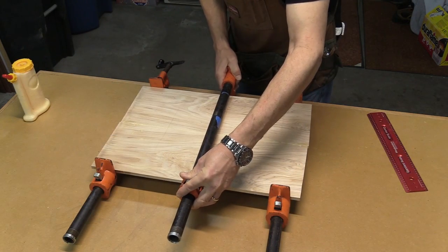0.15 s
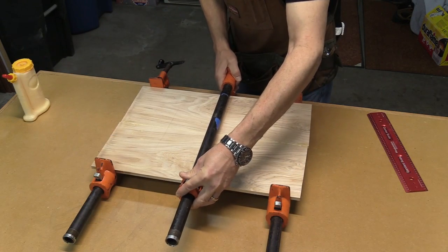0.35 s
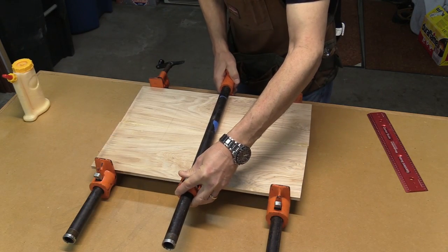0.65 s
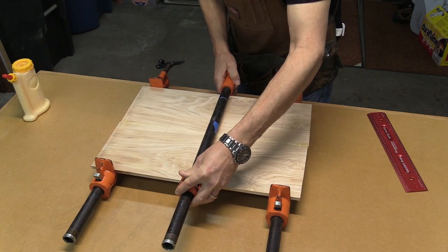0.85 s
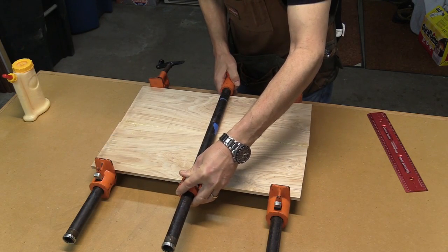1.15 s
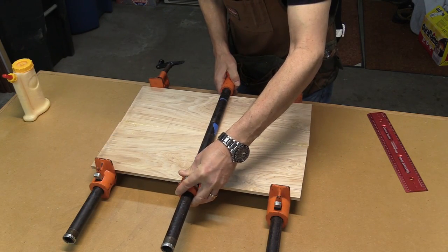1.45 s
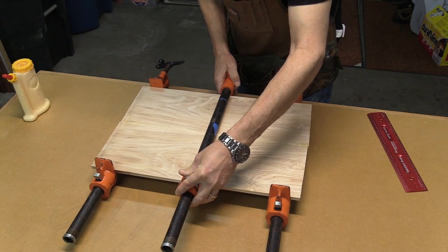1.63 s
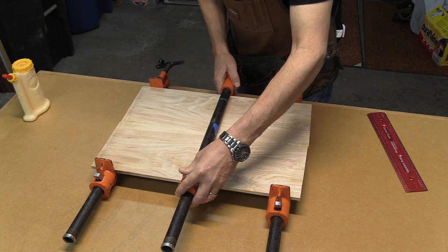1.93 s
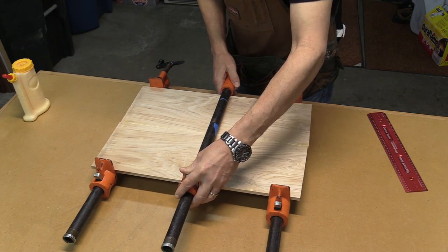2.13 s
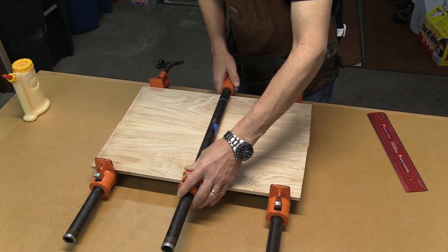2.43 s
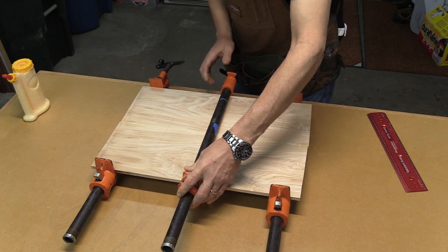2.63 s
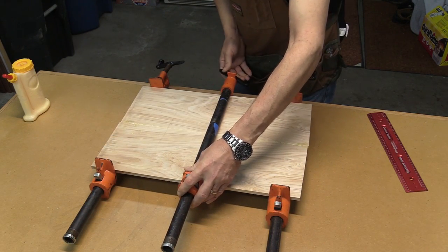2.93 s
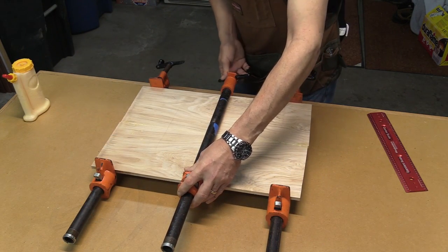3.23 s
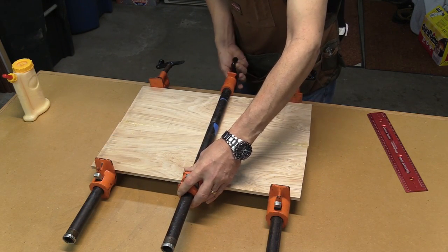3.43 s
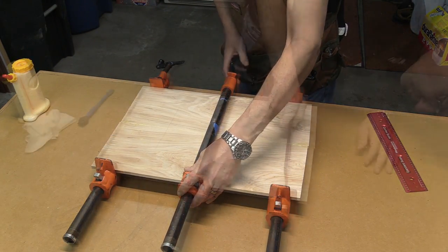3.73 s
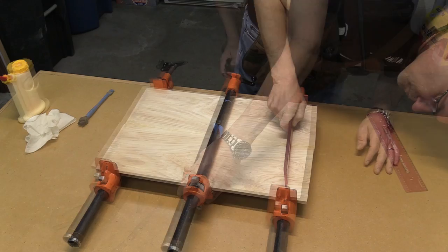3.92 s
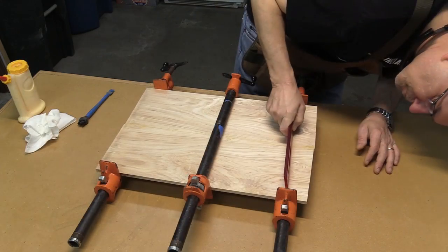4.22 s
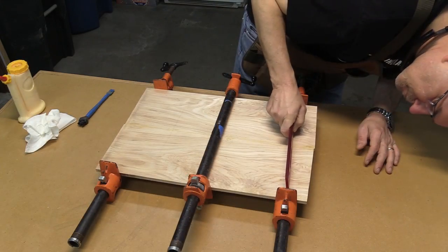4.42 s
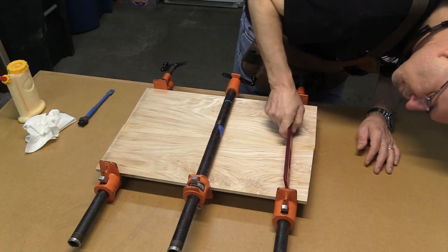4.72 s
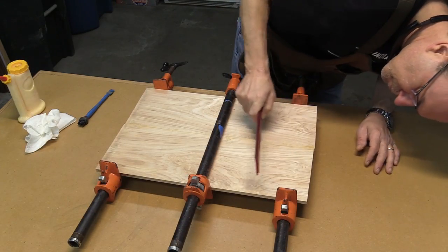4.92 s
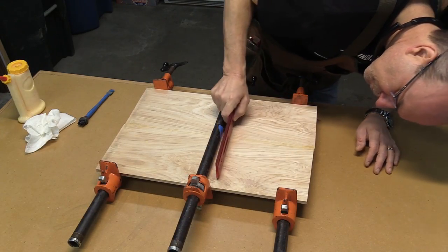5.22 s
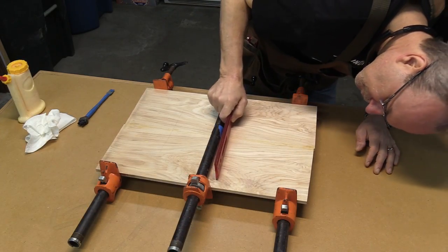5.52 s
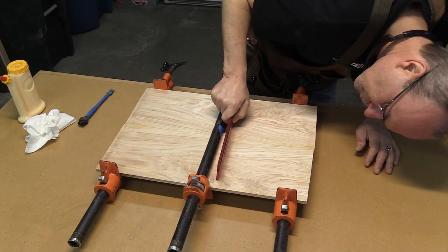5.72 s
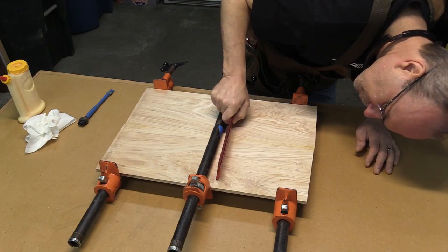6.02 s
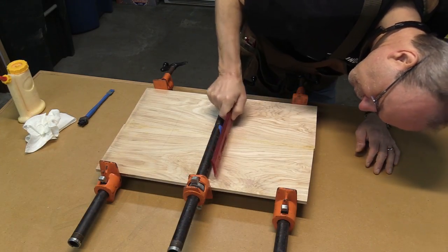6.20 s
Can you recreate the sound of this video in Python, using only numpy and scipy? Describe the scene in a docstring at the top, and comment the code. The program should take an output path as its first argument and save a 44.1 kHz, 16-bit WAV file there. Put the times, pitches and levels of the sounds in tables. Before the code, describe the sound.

Close, central handling sounds over soft hiss and low hum in a modest room. A clamp jaw scrapes along its pipe, iron thuds lightly on a panel, and the screw grates amid clustered clanks. After faint high chirps the hum drops, a ruler whispers over wood, then slaps down in several rapid hard clacks with a woody boom, far louder than everything before.

```python
"""Clamp and ruler on a wooden panel

A pipe clamp is set across a glued panel on a workbench: steel tings, its jaw rubs along the pipe, iron knocks
on wood, the screw strains and seems to squeak. Then a ruler slides over the panel and clacks down on it.
Blows are sums of decaying modes with a short noise crack, and so are the tings and squeaky chirps;
friction is coloured noise shaped by hand speed.
A small reverberant room answers, over steady air noise, hiss and a faint hum."""
import sys
import numpy as np
from scipy import signal
from scipy.fft import rfft, irfft
from scipy.io import wavfile

SR = 44100
rng = np.random.default_rng(int(sys.argv[2]) if len(sys.argv) > 2 else 0)


def to_wav(sig):
    """Store sig (one row per channel, or 1-D mono) as 16-bit WAV at the path in sys.argv[1].

    Samples outside -1..1 are clipped; the rate is SR.
    """
    pcm = np.clip(np.atleast_2d(sig), -1, 1) * 32767
    pcm = np.round(pcm).astype(np.int16)
    wavfile.write(sys.argv[1], SR, pcm.T)  # frames by channels


N = 280476
TIME = np.arange(N) / SR  # seconds


def amp(db):
    """Decibel law: 20 dB is a tenfold amplitude."""
    return 10 ** (np.asarray(db) / 20)


def evened(x):
    """Power normalisation: scales x to rms 1."""
    return x / np.sqrt(np.mean(x ** 2) + 1e-20)


def read(points, hz):
    """Logarithmic frequency scale: interpolates a table along it."""
    table_hz, value = np.transpose(points)
    return np.interp(np.log(hz + 1), np.log(table_hz), value)


def level(rows):
    """Gain envelope: straight lines in decibels against time."""
    return amp(np.interp(TIME, *np.transpose(rows)))


def coloured(x, spectrum):
    """Linear filtering: weights the spectrum of x by a table, at rms 1."""
    gain = amp(read(spectrum, np.fft.rfftfreq(len(x), 1 / SR)))
    return evened(irfft(rfft(x) * gain, len(x)))


def add(mix, start_s, sound):
    """Superposition: mixes a sound in at its start time."""
    part = mix[round(start_s * SR):][:len(sound)]
    part += sound[:len(part)]


def thump(pitch_hz, t60_s, rise_s):
    """Bending vibration: one decaying panel mode of peak 1, swelling as it is pushed."""
    t = TIME[:SR // 3]
    swell = 1 - np.exp(-t / rise_s)
    swing = swell * amp(-60 * t / t60_s) * np.sin(2 * np.pi * pitch_hz * t)
    return swing / abs(swing).max()


def strike(modes, body, hardness_hz, crack_db, crack_t60_s, rise_s, low_hz):
    """Modal impact: ringing modes plus a crack of countless weak ones; soft contact dulls both."""
    t = TIME[:SR // 2]
    ring = sum(amp(db - 60 * t / t60) * np.sin(2 * np.pi * hz * t) for hz, db, t60 in modes)
    crack = amp(crack_db - 60 * t / crack_t60_s) * coloured(rng.standard_normal(len(t)), body)
    blow = (1 - np.exp(-t / rise_s)) * (ring + crack)  # the contact force takes a moment to build
    blow = signal.lfilter(*signal.butter(2, min(hardness_hz, SR / 3), fs=SR), blow)
    blow = signal.lfilter(*signal.butter(2, low_hz, "high", fs=SR), blow)  # small objects radiate little bass
    early_power = np.mean(blow[t < .008] ** 2)
    return blow / np.sqrt(2 * early_power)  # the first 8 ms are as strong as a sine of height 1


# Knocks of the clamp on the panel: start_s [s], thump_peak_db [dB], thump_pitch_hz [Hz],
# thump_t60_s [s], clank_level_db [dB, as the height of an equally strong sine over 8 ms]
KNOCKS = [(1.0574, -23, 431, 0.052, -26.5), (1.0757, -35.5, 288, .04, -34.5),
          (1.1364, -27.5, 302, .055, -33.5), (1.1430, -29.5, 161, 0.14, -43), (1.1470, -29, 497, .11, -39),
          (1.8498, -21, 450, 0.035, -28), (1.9950, -36.5, 493, 0.033, -44),
          (2.1695, -20.5, 473, 0.022, -37), (2.1859, -32, 445, .03, -45), (2.5230, -30, 440, .03, -38),
          (3.0420, -28.5, 217, 0.09, -44), (3.0460, -33.5, 396, 0.056, -53), (3.0555, -37, 395, .05, -34),
          (3.1102, -33.5, 470, .06, -31.5), (3.1290, -35.5, 396, .06, -35), (3.2460, -34, 420, .07, -36),
          (3.2727, -29, 457, 0.092, -35.5), (3.3320, -37, 425, .07, -42), (3.3986, -28, 382, .06, -27.5),
          (3.4356, -26.5, 442, 0.17, -23), (3.4770, -26.5, 470, .032, -29.5),
          (3.4990, -30, 465, 0.054, -32.5), (3.5360, -20, 706, .045, -25.5), (3.5720, -32.5, 490, .03, -36),
          (6.3194, -34.5, 575, 0.019, -37.5)]
# The jaw catching on the pipe, iron on iron: start_s [s], clank_level_db [dB, as above]
CATCHES = [(0.7643, -43.5), (.7830, -43), (.8170, -42.5), (1.8440, -31.5), (1.9927, -37), (3.3960, -27),
           (3.4330, -23.5), (3.5350, -33)]
# Modes of the iron clamp: pitch_hz [Hz], relative_level_db [dB], t60_s [s]
CLAMP_MODES = [(403, -3, 0.04), (500, -19, 0.14), (731, 6.5, 0.034), (855, 5.5, 0.047), (993, 6.5, 0.047),
               (1562, 0.5, 0.055), (1850, -9, 0.049), (1877, 6.5, 0.018), (2090, -10, 0.046),
               (2350, -9, 0.11), (2893, -3.5, 0.034), (3340, -5, 0.044), (4800, -23, .03)]
# Dense upper modes of the clamp: frequency_hz [Hz], relative_density_db [dB per Hz]
CLAMP_BODY = [(80, -31), (170, -7.5), (420, 7.5), (600, -9), (1000, 4.5), (1300, -16), (1600, -5.5),
              (2000, -4), (2400, -27), (3400, -13.5), (5000, -18.5), (12000, -40)]
# Contact hardness of a knock whose clank is at KNOCK_DB, and the extra dB that double it
KNOCK_HARDNESS_HZ, KNOCK_DB, DOUBLING_DB = 930, -29.5, 10.5
CATCH_HARDNESS_HZ = 2400


def clamp():
    """Modal impact: a knock thumps the panel and clanks the iron, brighter when harder; a catch only clanks."""
    out = np.zeros(N)
    clanks = [(start_s, db, CATCH_HARDNESS_HZ) for start_s, db in CATCHES]
    for start_s, thump_db, pitch_hz, t60_s, clank_db in KNOCKS:
        add(out, start_s, amp(thump_db) * thump(pitch_hz, t60_s, rise_s=0.003))
        hardness_hz = KNOCK_HARDNESS_HZ * 2 ** ((clank_db - KNOCK_DB) / DOUBLING_DB)
        clanks.append((start_s, clank_db, hardness_hz))
    for start_s, db, hardness_hz in clanks:
        clank = strike(CLAMP_MODES, CLAMP_BODY, hardness_hz,
                       crack_db=9.5, crack_t60_s=0.057, rise_s=0.0013, low_hz=141)
        add(out, start_s, amp(db) * clank)
    return out


# Taps of the ruler on the panel: start_s [s], clack_level_db [dB, as the clanks],
# clack_hardness_hz [Hz], boom_level_db [dB, as the clanks]
TAPS = [(4.9755, -43.5, 1700, -49), (5.0670, -39, 1400, -43), (5.3349, -14, 2100, -21),
        (5.3376, -23, 1320, -12), (5.3705, -11.5, 2700, -44), (5.3735, -23, 1910, -14),
        (5.3790, -19, 1970, -27), (5.3876, -16, 1700, -18.5), (5.4596, -6.5, 1950, -22),
        (5.4621, -20.5, 2070, -16.5), (5.8410, -53.5, 1150, -50), (5.984, -53, 1910, -70)]
# Modes of the ruler, then of the panel: pitch_hz [Hz], relative_level_db [dB], t60_s [s]
RULER_MODES = [(877, -19, 0.023), (1064, -13.5, 0.044), (1160, -6, 0.041), (1217, 2.5, 0.028),
               (1526, -2.5, 0.028), (1597, -2, 0.029), (1737, -8, 0.037), (1910, -17, .03),
               (2570, -16, 0.032), (2930, -19.5, 0.035), (3410, -13.5, .018), (4210, -11, 0.016),
               (5790, -21, .012), (7760, -19, .009)]
PANEL_MODES = [(202, -7.5, .16), (343, -10, 0.11), (419, -2.5, 0.135), (454, -1, 0.2), (566, -2.5, 0.15),
               (590, -4.5, .13), (702, -8, .14), (869, -4.5, 0.19), (933, -4.5, 0.16)]
# Dense upper modes of the ruler, then of the panel: frequency_hz [Hz], relative_density_db [dB per Hz]
RULER_BODY = [(100, -35), (300, -2), (900, 5), (1200, 5), (1410, -9), (1560, 4), (1740, 5), (1840, -8),
              (2020, -7), (2200, -16), (2950, -15.5), (4500, -17), (8000, -15.5), (14000, -31)]
PANEL_BODY = [(60, -32), (130, -17), (200, -10.5), (270, -13), (420, -0.5), (580, 3), (660, -15),
              (920, -2.5), (1200, -3.5), (1410, -30), (1560, -3), (1750, -9.5), (2150, -23), (8000, -35)]


def ruler():
    """Coupled impact: the edge lands, one end just after the other, and sets the panel booming."""
    out = np.zeros(N)
    for start_s, clack_db, hardness_hz, boom_db in TAPS:
        clack = strike(RULER_MODES, RULER_BODY, hardness_hz,
                       crack_db=0, crack_t60_s=0.02, rise_s=0.00089, low_hz=390)
        boom = strike(PANEL_MODES, PANEL_BODY, hardness_hz=1410,
                      crack_db=2.5, crack_t60_s=0.091, rise_s=0.0012, low_hz=164)
        add(out, start_s, amp(clack_db) * clack)
        add(out, start_s, amp(boom_db) * boom)
    return out


def pushes(strokes, lean, steep):
    """Kinematics of the hand: one arch of speed a stroke, early if lean < 1, narrower if steep is high."""
    speed = np.zeros(N)
    for start_s, length_s, db in strokes:
        done = np.arange(0, length_s, 1 / SR) / length_s
        add(speed, start_s, amp(db) * abs(np.sin(np.pi * done ** lean)) ** steep)
    return speed


def slide(speed, colour, slips_per_s, spread_db, smooth):
    """Stick-slip friction: tiny uneven slips over a smooth rub, coloured by what slides, louder with speed."""
    slip_size = amp(spread_db * np.minimum(rng.exponential(1, N), 4))
    slips = (rng.random(N) < slips_per_s / SR) * slip_size * rng.choice([-1, 1], N)
    drive = evened(slips) + smooth * rng.standard_normal(N)
    return speed * coloured(drive, colour)


# Strokes of the jaw along the pipe: start_s [s], length_s [s], level_db [dB rms at the top of the arch]
JAW_SLIDE = [(.41, .16, -42.5), (.595, .1, -51.5), (.715, 0.14, -52), (.97, 0.25, -55.5), (1.81, 0.16, -58)]
# Their colour: frequency_hz [Hz], relative_density_db [dB per Hz]
JAW_RUB = [(150, 0), (450, -6.5), (700, -1), (1150, 5), (1600, -1.5), (2250, 6.5), (2700, -7.5), (3200, -8),
           (4300, -12), (5100, -6.5), (6000, -17), (9000, -16), (13000, -45)]


def jaw_slide():
    """Sliding friction: the jaw rubs along the pipe."""
    speed = pushes(JAW_SLIDE, lean=0.73, steep=1.8)
    return slide(speed, JAW_RUB, slips_per_s=1300, spread_db=1.5, smooth=1.0)


# Strokes of the ruler over the panel: start_s [s], length_s [s], level_db [dB rms at the top of the arch]
RULER_SLIDE = [(4.16, .18, -45.5), (4.43, .32, -56), (4.87, 0.13, -48), (6.278, 0.042, -39)]
# Their colour: frequency_hz [Hz], relative_density_db [dB per Hz]
RULER_RUB = [(150, 1), (450, 1.5), (750, 0.5), (950, 0), (1150, 2.5), (1400, -1), (1600, -2), (1750, 3),
             (1880, 2), (2050, -9.5), (3500, -16), (5500, -17.5), (9000, -27), (14000, -44)]


def ruler_slide():
    """Sliding friction: the ruler rubs over the wood."""
    speed = pushes(RULER_SLIDE, lean=0.72, steep=1.5)
    return slide(speed, RULER_RUB, slips_per_s=1600, spread_db=3.0, smooth=1.0)


# The ruler buzzing between its bounces: start_s [s], length_s [s], level_db [dB rms at the top of the arch]
RULER_BUZZ = [(5.366, .135, -39.5)]
# Its colour: frequency_hz [Hz], relative_density_db [dB per Hz]
BUZZ_RUB = [(500, -24), (1800, 8.5), (2700, -0.5), (3500, -2), (4700, -4.5), (5500, -20), (8000, -24),
            (12000, -43)]


def ruler_buzz():
    """Chatter at a contact: a buzz that swells fast and fades slowly."""
    speed = pushes(RULER_BUZZ, lean=0.31, steep=1.1)
    return slide(speed, BUZZ_RUB, slips_per_s=740, spread_db=-1, smooth=.7)


# Turns of the screw in its thread: start_s [s], length_s [s], level_db [dB rms at the top of the arch]
SCREW_TURN = [(3.02, 0.22, -50.5), (3.22, 0.23, -50.5), (3.42, 0.2, -38)]
# Their colour: frequency_hz [Hz], relative_density_db [dB per Hz]
SCREW_RUB = [(80, -23), (200, 4), (450, 1.5), (620, 1), (1000, 2), (1300, -19), (1600, -18), (2000, -14),
             (2500, -22), (3400, -29), (8000, -45)]


def screw_turn():
    """Loaded friction: the thread grates in coarse slips."""
    speed = pushes(SCREW_TURN, lean=0.76, steep=0.55)
    return slide(speed, SCREW_RUB, slips_per_s=300, spread_db=0, smooth=0.3)


# The panel shifting on the bench under the clamp: start_s [s], length_s [s],
# level_db [dB rms at the top of the arch]
PANEL_SHIFT = [(1.055, 0.077, -37), (1.13, 0.072, -41)]
# Its colour: frequency_hz [Hz], relative_density_db [dB per Hz]
PANEL_RUB = [(50, -10), (100, -5), (170, 6.5), (400, -11), (600, -24), (900, -6.5), (1400, -35),
             (6000, -57)]


def panel_shift():
    """Friction of a broad plate: the panel scrapes low and dull on the bench."""
    speed = pushes(PANEL_SHIFT, lean=0.7, steep=0.96)
    return slide(speed, PANEL_RUB, slips_per_s=200, spread_db=1.5, smooth=0.41)


# Steel tinging near the start, then brief high metallic chirps as of the screw squeaking:
# start_s [s], level_db [dB, as the clanks], hardness_hz [Hz], pitch_factor [ratio]
TINGS_AND_CHIRPS = [(.1300, -41, 7000, 1), (.1440, -48.5, 5000, 1), (3.8000, -56, 6000, 1.39),
                    (3.8930, -52.5, 9000, 1.58), (3.9230, -55, 9000, 1.58)]
# Modes of the steel at pitch factor 1: pitch_hz [Hz], relative_level_db [dB], t60_s [s]
STEEL_MODES = [(2116, -7, .4), (2320, -10, .4), (2810, -3, .35), (2939, -8, .6), (2993, -3, .5),
               (3273, -10, .4), (3892, -14, .35), (4177, -14, .4), (4581, -6, .35), (4680, -6, .3),
               (5430, -8, .16), (5895, -9, .45), (7100, -5, .12), (7800, -6, .13)]
# Dense upper modes of the steel: frequency_hz [Hz], relative_density_db [dB per Hz]
STEEL_BODY = [(1500, -4), (2900, -4), (3700, -6), (4700, -2), (6500, -9), (7800, -1), (9500, -30)]


def tings_and_chirps():
    """Scaling of modes: steel tings ring high and long; the same modes, raised and shortened, give the chirps."""
    out = np.zeros(N)
    for start_s, db, hardness_hz, pitch in TINGS_AND_CHIRPS:
        modes = np.array(STEEL_MODES) * [pitch, 1, 1 / pitch ** 2]
        ting = strike(modes, STEEL_BODY, hardness_hz,
                      crack_db=7.5, crack_t60_s=0.072, rise_s=0.0013, low_hz=1500)
        add(out, start_s, amp(db) * ting)
    return out


def fidget(per_s, db, pitch_hz):
    """Random excitation: faint bumps of hands leaning on the work, up to 10 dB weaker, an octave either way."""
    out = np.zeros(N)
    for when, size, place in rng.random((int(per_s * N / SR), 3)):
        bump = thump(pitch_hz * 2 ** (2 * place - 1), t60_s=0.025, rise_s=0.0022)
        add(out, when * TIME[-1], amp(db - 10 * size) * bump)
    return out


# Reverberation time of the room: frequency_hz [Hz], t60_s [s]
ROOM_T60 = [(150, 0.46), (500, 0.5), (1000, 0.51), (1700, 0.55), (3000, 0.3), (8000, 0.72)]
# Colour of the tail at its start: frequency_hz [Hz], relative_level_db [dB]
ROOM_COLOUR = [(100, 4.5), (350, 4.5), (480, 0), (900, -3.5), (1250, -9), (1750, -10.5), (2300, -5),
               (4000, -11), (9000, -11)]
# First reflections: delay_s [s], level_db [dB against the direct sound]
ECHOES = [(.0062, -29.5), (0.0096, -22.5), (0.016, -18.5)]


def room(x, wet_db, build_s=0.0035):
    """Reverberation: echoes off bench and floor, then a diffuse tail whose bands die at their own speed."""
    sparse_clicks = rng.choice([-1., 1.], SR) * (rng.random(SR) < 1 / 10)
    hz, t, bands = signal.stft(sparse_clicks, SR, nperseg=256)
    bands = bands * amp(read(ROOM_COLOUR, hz)[:, None] - 60 * t / read(ROOM_T60, hz)[:, None])
    tail = signal.istft(bands, SR, nperseg=256)[1][:SR]
    tail = tail * (1 - np.exp(-(TIME[:SR] / build_s) ** 2))
    response = amp(wet_db) * tail / np.linalg.norm(tail)
    for delay_s, db in ECHOES:
        add(response, delay_s, amp(db) * signal.windows.hann(9) / 4)  # a soft pulse of sum 1
    return x + signal.fftconvolve(x, response)[:N]


# Spectrum of the shop air, then of the hiss: frequency_hz [Hz], relative_density_db [dB per Hz]
AIR = [(20, -14.5), (35, -9), (52, -2.5), (85, -8.5), (130, -7.5), (180, -8), (310, -9), (430, -9),
       (650, -17), (930, -16), (1300, -21), (1900, -26), (3000, -27.5), (15500, -35.5)]
HISS = [(20, 2.5), (250, -8.5), (1000, -12.5), (7500, -13), (15500, -16.5)]
AIR_DB, HISS_DB = -50.5, -60.5  # dB rms
# Machinery drone: pitch_hz [Hz], width_hz [Hz, at half amplitude], level_db [dB rms before HUM_LEVEL]
HUM = [(56.5, 5.7, -65.5), (302.4, 2.9, -65.5), (912, 4.5, -69.5)]
MAINS_HZ, MAINS_DB = 58.6, -60  # Hz, dB rms before HUM_LEVEL
# Gain on drone and mains hum: time_s [s], gain_db [dB]
HUM_LEVEL = [(0, 3), (3.7, 5), (4.1, -4.5)]


def background():
    """Stationary noise: air, mains hum and a drone of wavering narrow bands, with hiss opposed in the channels."""
    hz = np.fft.rfftfreq(N, 1 / SR)
    hum = amp(MAINS_DB) * evened(np.sin(2 * np.pi * MAINS_HZ * TIME))
    for pitch_hz, width_hz, db in HUM:
        resonance = 1 / (1 + (2 * (hz - pitch_hz) / width_hz) ** 2)
        hum += amp(db) * evened(irfft(rfft(rng.standard_normal(N)) * resonance, N))
    air = amp(AIR_DB) * coloured(rng.standard_normal(N), AIR)
    hiss = amp(HISS_DB) * coloured(rng.standard_normal(N), HISS)
    return air + level(HUM_LEVEL) * hum + np.array([hiss, -hiss])


def scene():
    """Superposition: all the work is central; each group of sources excites the room by its own amount."""
    heavy = clamp() + screw_turn() + panel_shift()
    small = jaw_slide() + ruler_slide() + ruler_buzz() + tings_and_chirps()
    small += fidget(per_s=13, db=-47.5, pitch_hz=348)
    work = room(heavy, wet_db=-19.5) + room(ruler(), wet_db=-13) + room(small, wet_db=-10.0)
    return work + background()


EDGE_HZ = 15850


def record(dry):
    """Saturation and band limit: the input rounds off the highest peaks, then a low-pass ends the treble."""
    rounded = dry / (1 + (dry / .9) ** 6) ** (1 / 6)
    low_pass = signal.firwin(511, EDGE_HZ, window=("kaiser", 9), fs=SR)
    return signal.oaconvolve(rounded, low_pass[None], "same", axes=1)


dry = scene()
out = record(dry)
to_wav(out)
```